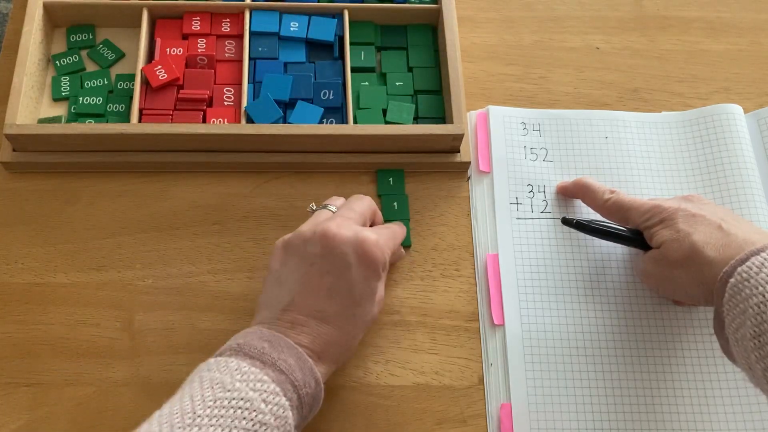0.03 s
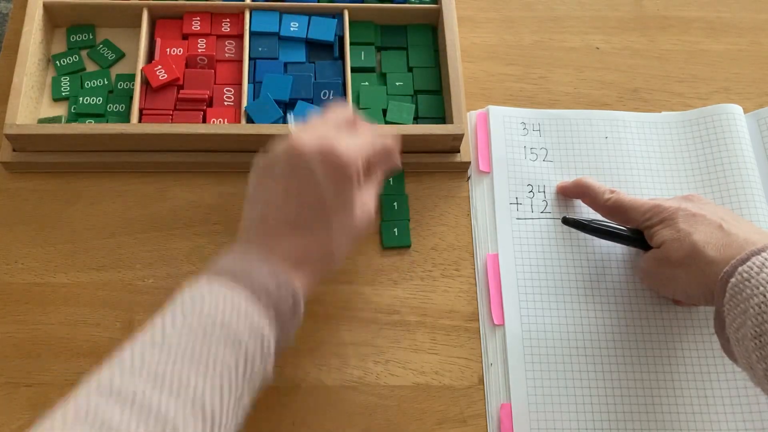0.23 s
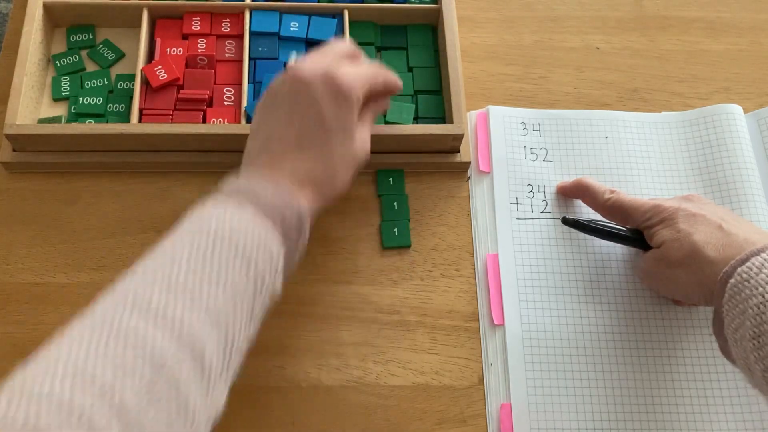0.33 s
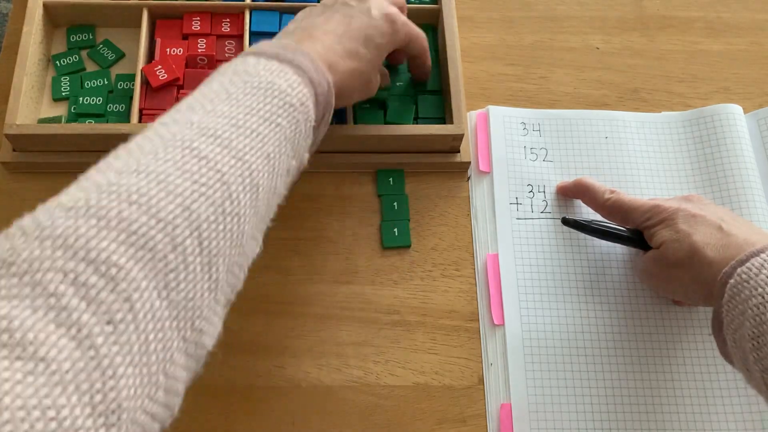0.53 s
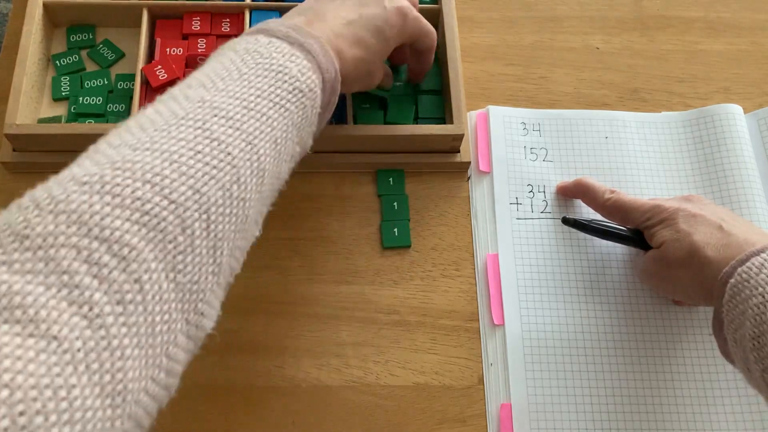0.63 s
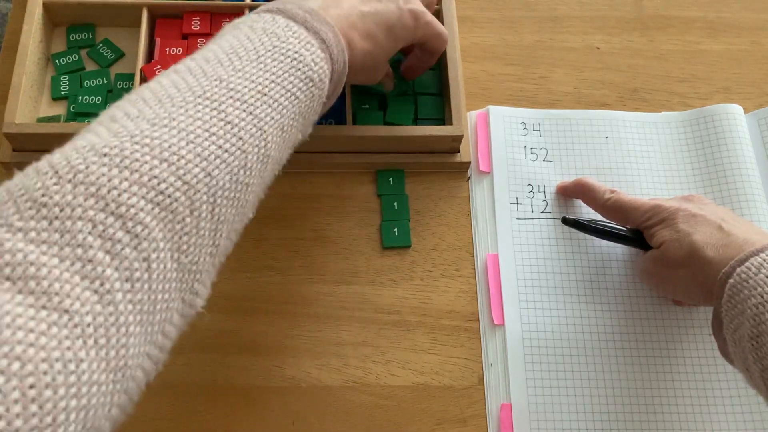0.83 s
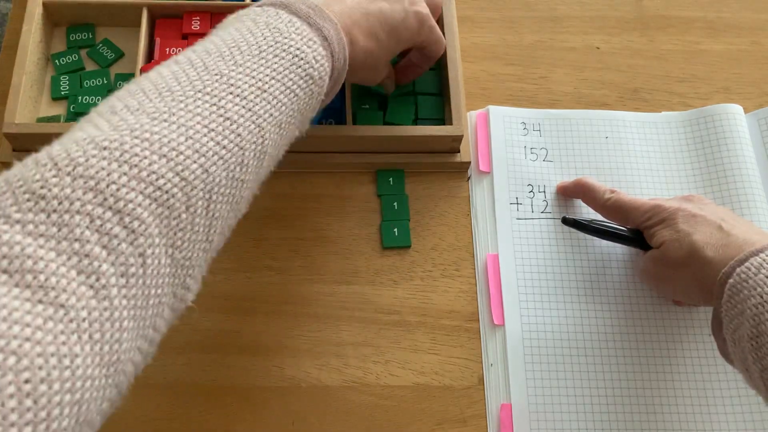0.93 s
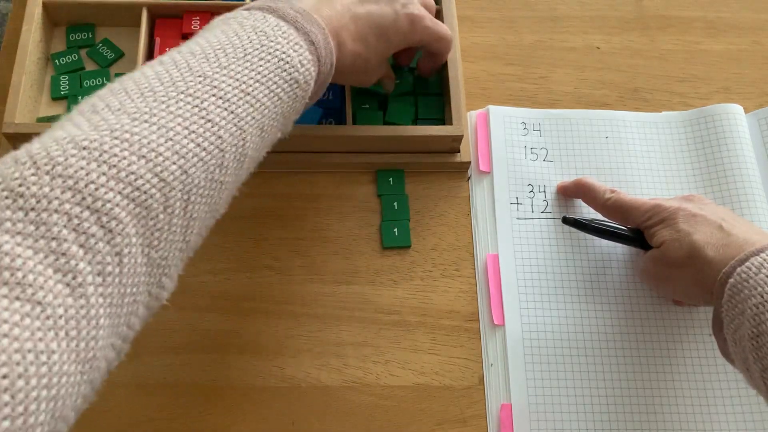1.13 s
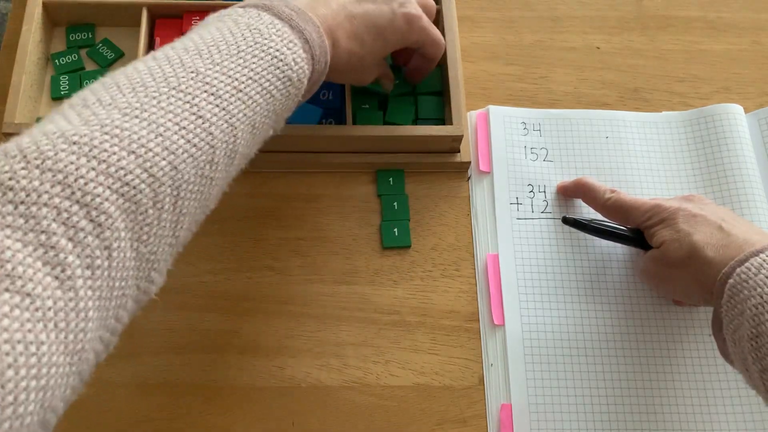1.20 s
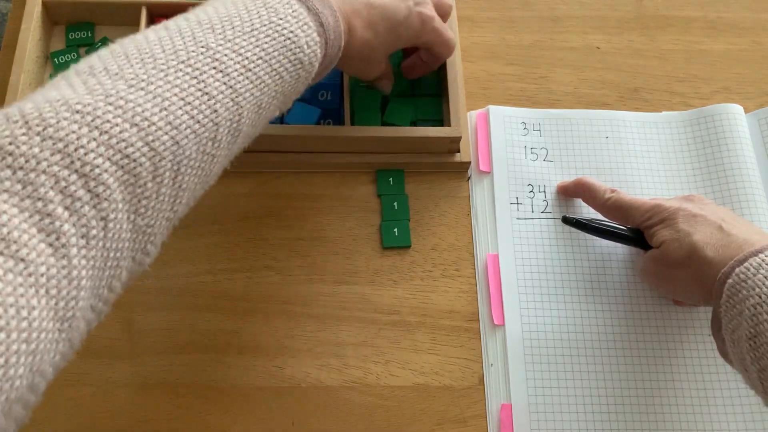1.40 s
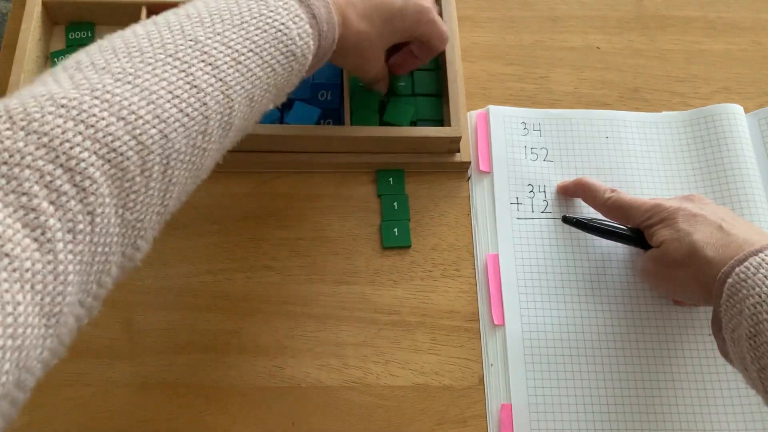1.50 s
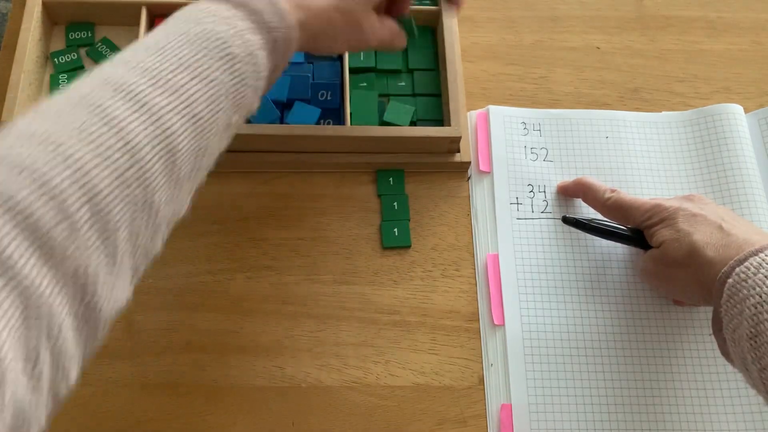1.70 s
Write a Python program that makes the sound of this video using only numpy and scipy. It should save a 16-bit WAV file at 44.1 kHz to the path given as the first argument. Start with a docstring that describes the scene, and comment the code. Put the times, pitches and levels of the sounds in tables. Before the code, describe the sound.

Small wooden tiles click and scrape as fingers pick through a wooden box. First, at 0.2 seconds, a soft puff of air thumps the left microphone. The light, irregular taps run from 0.5 to about 1.6 seconds, with sharper clacks near 0.8 and 1.35 and the loudest at 1.2, briefly ringing the box. A knitted sleeve rubs faintly over the low hum and hiss of a small, quiet room.

```python
"""Faint hum, hiss and a sleeve's rustle, then a soft thump: a reaching arm pushes a puff of air
over the left microphone. Fingers pick through small wooden tiles in a wooden box on a table.
The tiles scrape and tap against each other and bump the floor of the box; the box and its air
ring briefly and a small quiet room answers. The knitted sleeve rubs on the box as the arm leans in."""
import sys
import numpy as np
from scipy import signal
from scipy.fft import rfft, irfft, next_fast_len
from scipy.io import wavfile

SR = 44100
rng = np.random.default_rng(int(sys.argv[2]) if len(sys.argv) > 2 else 0)


def unload_audio(sound):
    """Save the sound as a 16-bit wav file, at the path given as the first command line argument."""
    columns = np.transpose(np.atleast_2d(sound))
    # keep every value between -1 and 1, then stretch to whole-number steps
    steps = np.round(np.clip(columns, -1, 1) * 32767)
    wavfile.write(sys.argv[1], SR, steps.astype(np.int16))


N = 77175

# room hum: freq_hz, level_db
HUM_SPECTRUM = [(20, -17), (50, -17), (78, 9), (115, -2), (170, -2), (210, -4), (280, -3), (340, -12),
                (500, -15), (900, -60.5), (3000, -53.5)]
# drone: time_s, level_db
DRONE_ENVELOPE = [(0, -73), (.35, -72.5), (.55, -66.5), (.73, -65.5), (.86, -72.5), (1.0, -58),
                  (1.12, -59.5), (1.35, -71), (1.47, -56), (1.599, -65.5), (1.75, -63)]
# microphone hiss: freq_hz, level_db
HISS_SPECTRUM = [(100, -35), (900, -7), (2000, 3), (4200, 10), (6000, 6.5), (8300, 9.5), (10300, 4),
                 (12000, -4), (14500, -4), (16000, -14)]
# sleeve motion: time_s, rumble_db, rub_db
SLEEVE_ENVELOPE = [(0, -57, -66.5), (.12, -73, -78.5), (.4, -80, -76), (0.799, -100, -64.5),
                   (1.0, -60.5, -60.5), (1.15, -64, -71.5), (1.24, -50.5, -65), (1.34, -53, -57.5),
                   (1.45, -62.5, -59.5), (1.56, -69, -55.5), (1.63, -59, -54.5), (1.75, -55, -61.5)]
# sleeve rumble: freq_hz, level_db
RUMBLE_SPECTRUM = [(22, -11), (45, 1.5), (68, 17.5), (110, -3), (200, -9.5), (400, -72)]
# knit rubbing: freq_hz, level_db
RUB_SPECTRUM = [(100, 2), (350, 0.5), (700, -4), (1200, -15), (3000, -11.5), (10000, -31.5)]
# air noise in the puff: freq_hz, level_db
PUFF_SPECTRUM = [(30, -25), (100, 18.5), (250, 3.5), (450, -13), (800, -44), (1500, -74)]
# finger pushes: start_s, length_s, level_db
PUSHES = [(0.501, 0.062, -53.5), (0.606, 0.062, -54), (0.802, 0.044, -54.5), (0.926, 0.026, -43.5),
          (1.037, 0.034, -51), (1.134, 0.11, -53.5), (1.33, 0.057, -61), (1.481, 0.083, -49),
          (1.586, 0.066, -56)]
# sliding tiles: freq_hz, level_db
SCRAPE_SPECTRUM = [(300, -57), (800, -8), (1200, 4.5), (2400, 7.5), (4000, 3.5), (7000, -9.5), (15000, -59)]
# tile contacts, plus the loudest clack's wall echo (1.1972 s) and the box's swelling ring after it
# (1.2137 s): start_s, knock_db, clack_db, tick_db, pitch_hz
TRANSIENTS = [(0.516, -41.5, -49.5, -66, 2400), (0.5183, -38, -49, -64, 2300),
              (0.5211, -42.5, -58, -66, 4150), (0.5313, -35.5, -52, -62, 2630),
              (0.5394, -48, -46, -49, 2860), (0.642, -36, -41.5, -51, 2360),
              (0.7487, -40, -50.5, -56, 2760), (0.7649, -34.5, -26.5, -22, 2970),
              (0.806, -44, -38, -43, 3300), (0.8124, -39, -38, -51, 2760), (0.8163, -26.5, -43, -60, 2820),
              (0.9319, -33, -54, -56, 3600), (0.933, -41, -37, -64, 2900), (0.935, -38, -34.5, -48, 3780),
              (0.9503, -59, -51, -54, 2710), (1.023, -35, -67, -61, 2140),
              (1.0454, -39, -43.5, -65.5, 3800), (1.0545, -40, -49.5, -57, 1770),
              (1.1825, -58, -48, -54, 3000), (1.1891, -31, -34, -50, 3590), (1.1902, -28.5, -17, -25, 1884),
              (1.1972, -46, -44, -52, 3750), (1.2137, -39.5, -55, -70, 1750), (1.302, -54, -41, -35, 1740),
              (1.3136, -40, -59, -66, 1260), (1.326, -43.5, -66, -68, 1910),
              (1.3492, -40, -35.5, -47, 4290), (1.3575, -30.5, -28.5, -28.5, 3730),
              (1.373, -51, -61, -49, 3750), (1.4912, -35, -48, -71, 3620), (1.5109, -35, -45, -52, 1860),
              (1.5152, -33.5, -35, -44, 2980), (1.5262, -35, -48, -53, 4040),
              (1.5625, -45, -49.5, -60, 2220), (1.6238, -47, -51.5, -83, 3030)]
# low register of a transient: freq_hz, level_db
KNOCK_SPECTRUM = [(300, -12), (800, -41), (1200, -9.5), (1800, 9), (3000, 8), (4200, 5.5), (5500, -20),
                  (9000, -54)]
# middle register: freq_hz, level_db
CLACK_SPECTRUM = [(2500, -20), (4000, -8), (5500, -3), (7200, 1), (9000, 0), (10300, -7), (13000, -16),
                  (16000, -30)]
# top register: freq_hz, level_db
TICK_SPECTRUM = [(7000, -25), (10500, -12), (12500, 0), (14300, 0), (15400, -5), (16600, -26)]
# struck tile: freq_hz, level_db, t60_s
TILE_MODES = [(3550, -11, .007), (6140, -5, .007), (7350, 0, .008), (8300, -1, .008), (9000, -2, .007),
              (12900, 0, .005), (14350, 0, .005)]
# filled box: freq_hz, level_db, t60_s
BOX_MODES = [(1058, -15, .25), (1665, -3, .25), (1775, 4, .3), (1868, 3, .3), (2560, -8, .2),
             (2680, -8, .15), (2945, -10, .15), (3590, -8, .1), (3736, -6, .1), (4540, -5, .15),
             (5110, -8, .14), (6105, -10, .15), (7170, -10, .14), (7370, -10, .14), (8560, -8, .15)]
# room tail: freq_hz, t60_s
ROOM_DECAY = [(300, 2.9), (2000, 0.47), (5000, 0.3), (9000, 0.34), (15000, 0.66)]
# room colour: freq_hz, gain_db
ROOM_SPECTRUM = [(300, -8.5), (1500, -0.5), (2700, -1.5), (6000, -6.5), (9000, -10), (12500, -18.5),
                 (14800, -13), (16500, -26)]
# tiles on the box floor: start_s, level_db, pitch_hz
FLOOR_BUMPS = [(1.337, -50.5, 690), (1.625, -49.5, 1030)]

ATTACK_S, TOP_HZ = 0.0005, 16700
BASS_PAN_DB, WOOD_PAN_DB = 1, -2.1
WOOD_SPREAD, EDGE_SPREAD = 0.7, 0.25  # side-to-mid ratios
HIT_SAMPLES, HIT_ENERGY = 1024, 100


def amp(db):
    """Decibels to gain."""
    return 10 ** (np.asarray(db) / 20)


def unit(x):
    """Scale to rms 1."""
    return x / np.sqrt(np.mean(x ** 2) + 1e-20)


def noise(size=N):
    """Two independent white noises."""
    return rng.standard_normal((2, size))


def along(points, hz):
    """Interpolate (freq_hz, value) points on a log axis."""
    freq_hz, values = np.transpose(points)
    return np.interp(np.log(hz + 1), np.log(freq_hz + 1), values)


def envelope(time_s, level_db):
    """Gain per sample from breakpoints."""
    return amp(np.interp(np.arange(N) / SR, time_s, level_db))


def filtered(x, response):
    """Apply a frequency response."""
    n = x.shape[-1]
    padded = next_fast_len(2 * n)
    return irfft(rfft(x, padded) * response(np.fft.rfftfreq(padded, 1 / SR)), padded)[..., :n]


def coloured(x, spectrum):
    """Shape x by a spectrum table, at rms 1."""
    return unit(filtered(x, lambda hz: amp(along(spectrum, hz))))


def stereo(x, correlation):
    """Mix two independent signals to a correlated left and right."""
    angle = np.arccos(correlation) / 2
    mid, side = np.cos(angle) * x[0], np.sin(angle) * x[1]
    return np.array([mid + side, mid - side])


def pan(db):
    """Gains of +db left, -db right."""
    return amp([[db], [-db]])


def lead(x, lead_s):
    """Put the left channel lead_s ahead of the right."""
    return filtered(x, lambda hz: np.exp(np.pi * 1j * hz * lead_s * np.array([[1], [-1]])))


def add(out, start_s, x):
    """Mix x into out at start_s."""
    i = round(start_s * SR)
    n = min(x.shape[-1], out.shape[-1] - i)
    out[:, i:i + n] += x[:, :n]


def background(hum_db=-63.5, hiss_db=-57, drone_hz=237.4, half_width_hz=3.5):
    """Low room hum, a wavering narrow-band drone and microphone hiss."""
    hum = amp(hum_db) * pan(BASS_PAN_DB) * coloured(stereo(noise(), 0.9), HUM_SPECTRUM)
    drone = filtered(stereo(noise(), 1), lambda hz: 1 / (1 + ((hz - drone_hz) / half_width_hz) ** 2))
    hiss = amp(hiss_db) * coloured(stereo(noise(), 0.018), HISS_SPECTRUM)
    return hum + envelope(*np.transpose(DRONE_ENVELOPE)) * unit(drone) + hiss


def sleeve():
    """Knit rubs and rumbles as the arm leans over the box; the bass lies to the left."""
    time_s, rumble_db, rub_db = np.transpose(SLEEVE_ENVELOPE)
    rumble = pan(BASS_PAN_DB) * coloured(stereo(noise(), 0.2), RUMBLE_SPECTRUM)
    rub = coloured(stereo(noise(), 0.21), RUB_SPECTRUM)
    return envelope(time_s, rumble_db) * rumble + envelope(time_s, rub_db) * rub


def puff(start_s=0.2025, length_s=0.043, eddy_db=-18.5, overtone_db=-31, air_db=-31.5, right_db=-18.5):
    """An eddy crosses the left microphone: one soft thump, falling in pitch."""
    end_hz, sweep_hz, fall_s = 70, 833, 0.00508
    t = np.arange(int(length_s * SR)) / SR
    pitch_hz = end_hz + sweep_hz * np.exp(-t / fall_s)
    phase = 2 * np.pi * np.cumsum(pitch_hz) / SR
    eddy = amp(eddy_db) * (np.sin(phase) + amp(overtone_db) * np.sin(2 * phase))
    air = amp(air_db) * coloured(noise(len(t)), PUFF_SPECTRUM)
    out = np.zeros((2, N))
    add(out, start_s, (eddy + air) * np.hanning(len(t)) * amp([[0], [right_db]]))
    return out


def slides(grains_per_s=940):
    """Tile edges catch and slip in dense tiny grains under each finger push."""
    push = np.zeros((1, N))
    for start_s, length_s, level_db in PUSHES:
        add(push, start_s, amp(level_db) * np.sqrt(np.abs(np.hanning(int(length_s * SR))))[None])
    slips = rng.random(N) < grains_per_s / SR
    grains = slips * noise() + 0.073 * noise()
    return push * pan(WOOD_PAN_DB) * coloured(stereo(grains, 0.062), SCRAPE_SPECTRUM)


def strike(t, t60_s):
    """Impact envelope: smooth rise, exponential decay."""
    return (1 - np.exp(-(t / ATTACK_S) ** 2)) * amp(-60 * t / t60_s)


def hit(x):
    """Scale one channel so its squares sum to HIT_ENERGY."""
    return unit(x) * np.sqrt(HIT_ENERGY / len(x))


def burst(colour_db, t60_s, spread):
    """A dense, quickly damped ring, as shaped noise."""
    t = np.arange(HIT_SAMPLES) / SR
    mid, side = filtered(noise(len(t)), lambda hz: amp(colour_db(hz))) * strike(t, t60_s)
    return np.array([hit(mid + spread * side), hit(mid - spread * side)])


def knock(pitch_hz, tone_db=-8, noise_db=-9, skirt_db_per_octave=4):
    """Woody part of a transient: a damped note and a burst around its pitch."""
    def colour_db(hz):
        return along(KNOCK_SPECTRUM, hz) - skirt_db_per_octave * np.abs(np.log2((hz + 1) / pitch_hz))
    t = np.arange(HIT_SAMPLES) / SR
    tone = hit(np.sin(2 * np.pi * pitch_hz * t) * strike(t, t60_s=0.0082))
    return amp(tone_db) * tone + amp(noise_db) * burst(colour_db, t60_s=0.014, spread=WOOD_SPREAD)


def tile_ring(low_hz, high_hz, size_scatter=0.012):
    """One tile's modes within a band; tiles differ slightly in size."""
    t = np.arange(HIT_SAMPLES) / SR
    hz, level_db, t60_s = np.transpose(TILE_MODES)[:, :, None]
    hz = hz * (1 + size_scatter * rng.standard_normal())
    in_band = (hz > low_hz) * (hz < high_hz)
    fade = amp(level_db + 2 * rng.standard_normal(hz.shape)) * strike(t, t60_s)
    modes = in_band * fade * np.sin(2 * np.pi * (hz * t + rng.random(hz.shape)))
    return hit(modes.sum(0))


def click(spectrum, band_hz, crack_t60_s, crack_db=-1.5, ring_db=-6.5):
    """Hard part of a transient: a noise crack plus the tile's modes in band_hz."""
    crack = burst(lambda hz: along(spectrum, hz), crack_t60_s, EDGE_SPREAD)
    return amp(crack_db) * crack + amp(ring_db) * tile_ring(*band_hz)


def box_ring(blur_hz=10):
    """Box modes, blurred by the loose tiles lying on the wood."""
    t = np.arange(SR // 3) / SR
    hz, level_db, t60_s = np.transpose(BOX_MODES)[:, :, None]
    level_db = level_db + 2 * rng.standard_normal(hz.shape)
    fade = amp(level_db - 60 * t / t60_s) * (1 - np.exp(-t / ATTACK_S))
    phase_steps = rng.standard_normal((2, len(hz), len(t))) * np.sqrt(2 * np.pi * blur_hz / SR)
    phase = 2 * np.pi * (hz * t + rng.random(hz.shape)) + np.cumsum(phase_steps, -1)
    return (fade * np.sin(phase)).sum(1)


def clatter(split_hz=11000, firm_db=-20, firm_ring_db=-46, ring_db_per_db=1.9):
    """Tile contacts, plus the loudest one's wall echo and box swell: each a knock, clack and tick."""
    body, edge = np.zeros((2, N)), np.zeros((2, N))
    for start_s, knock_db, clack_db, tick_db, pitch_hz in TRANSIENTS:
        add(body, start_s, amp(knock_db) * pan(WOOD_PAN_DB) * knock(pitch_hz))
        clack = click(CLACK_SPECTRUM, (0, split_hz), crack_t60_s=0.007)
        tick = click(TICK_SPECTRUM, (split_hz, TOP_HZ), crack_t60_s=0.004)
        add(edge, start_s, amp(clack_db) * clack + amp(tick_db) * tick)
    ring = box_ring()
    for start_s, knock_db, clack_db, _, _ in TRANSIENTS:
        drive_db = (knock_db + clack_db) / 2  # firm, hard contacts ring the box most
        add(body, start_s, amp(firm_ring_db + ring_db_per_db * (drive_db - firm_db)) * ring)
    edge = lead(edge, lead_s=0.000168) * [[1], [-1]]  # clicks reach the two sides in opposite phase
    return lead(body, lead_s=0.00004) + edge


def hollow(x, pitch_hz=1056, width_hz=18, peak_db=8):
    """The air in the box answers the tiles with one faint hollow note."""
    def resonance(hz):
        damping = 1j * hz * width_hz
        return damping / (pitch_hz ** 2 - hz ** 2 + damping)
    return amp(peak_db) * filtered(x, resonance)


def room(x, tail_db=-3.5, early_db=-9, echoes=10, early_span_s=0.022, delay_s=0.006):
    """Early echoes off the table and near walls, plus a half-second diffuse tail."""
    hz, t, bins = signal.stft(noise(SR // 2), SR, nperseg=256)
    decay = amp(-60 * t / along(ROOM_DECAY, hz)[:, None])
    _, tail = signal.istft(bins * decay, SR, nperseg=256)
    response = amp(tail_db) * tail / np.linalg.norm(tail[0])
    for channel in response:
        arrivals = (rng.random(echoes) * early_span_s * SR).astype(int)
        channel[arrivals] += amp(early_db) * rng.choice([-1, 1], echoes) / np.sqrt(echoes)
    out = np.zeros((2, N))
    add(out, delay_s, signal.fftconvolve(x, response, axes=1))
    return filtered(out, lambda hz: amp(along(ROOM_SPECTRUM, hz)))


def thuds():
    """Nudged tiles bump dully on the floor of the box."""
    out = np.zeros((2, N))
    for start_s, level_db, pitch_hz in FLOOR_BUMPS:
        colour_db = lambda hz: np.maximum(-18 * np.log2((hz + 1) / pitch_hz) ** 2, -100)
        add(out, start_s, amp(level_db) * burst(colour_db, t60_s=0.033, spread=WOOD_SPREAD))
    return out


def scene():
    """Tiles in their box and room, the moving arm, the background."""
    wood = clatter() + slides() + thuds()
    return wood + hollow(wood) + room(wood) + puff() + sleeve() + background()


def record(dry):
    """Brick-wall low-pass at TOP_HZ."""
    return filtered(dry, lambda hz: hz < TOP_HZ)


dry = scene()
out = record(dry)
unload_audio(out)
```